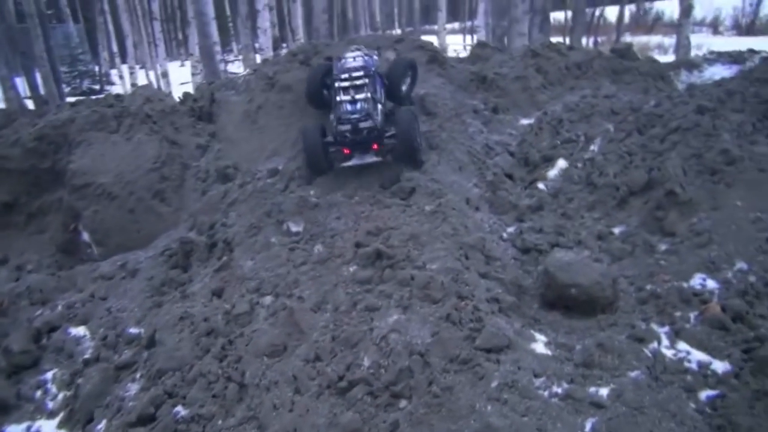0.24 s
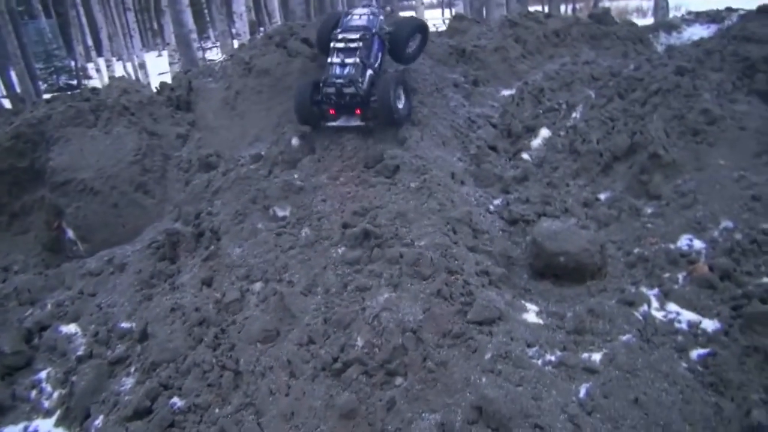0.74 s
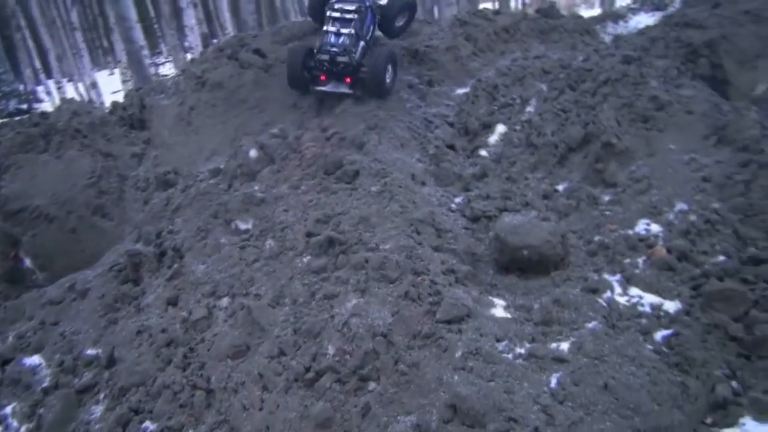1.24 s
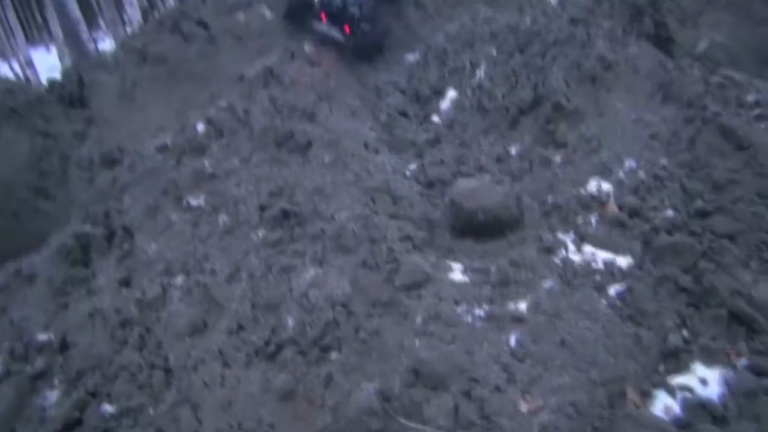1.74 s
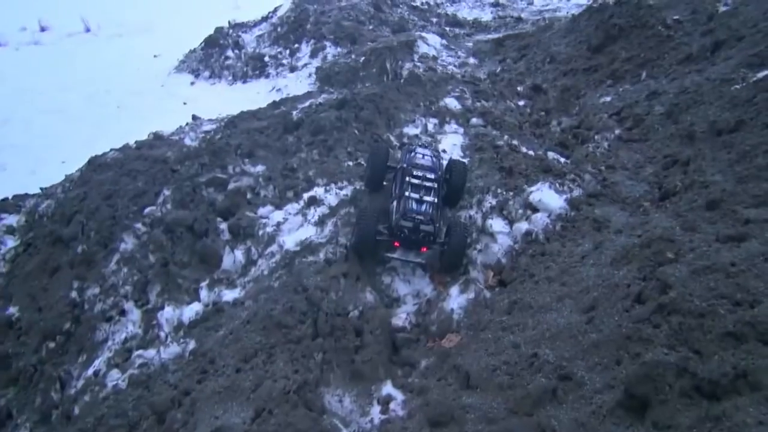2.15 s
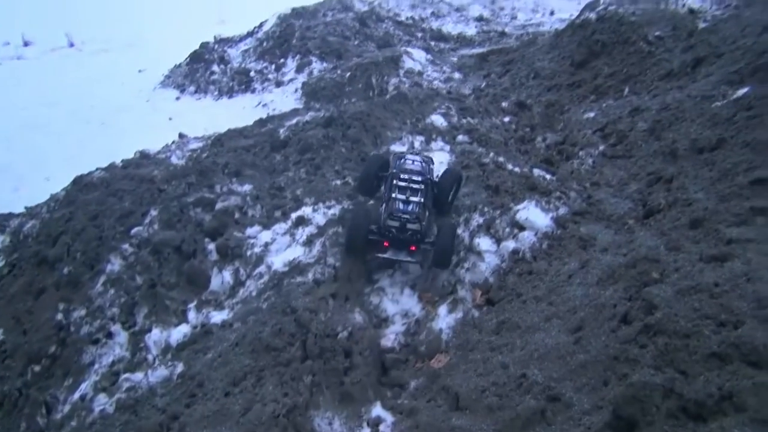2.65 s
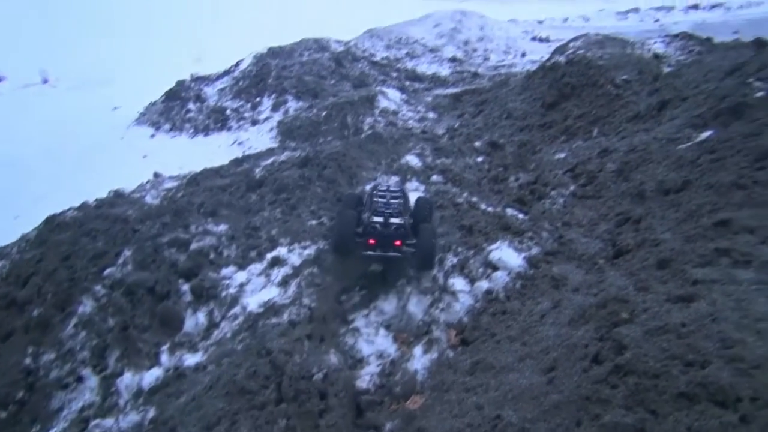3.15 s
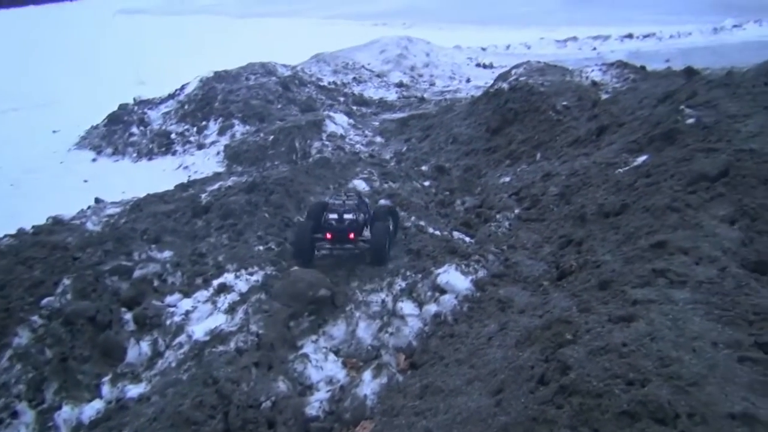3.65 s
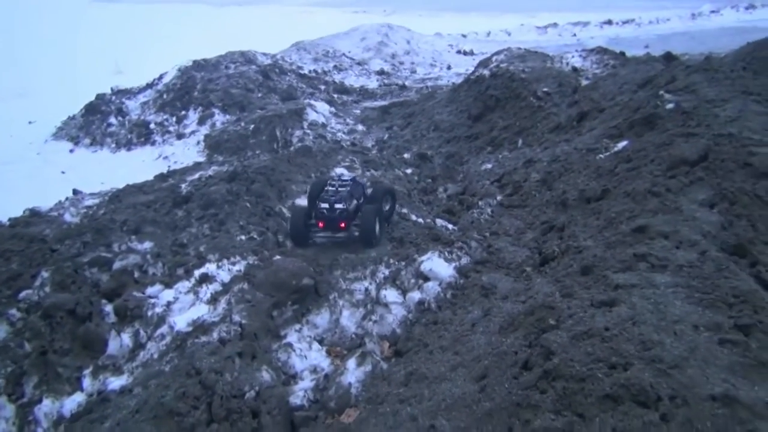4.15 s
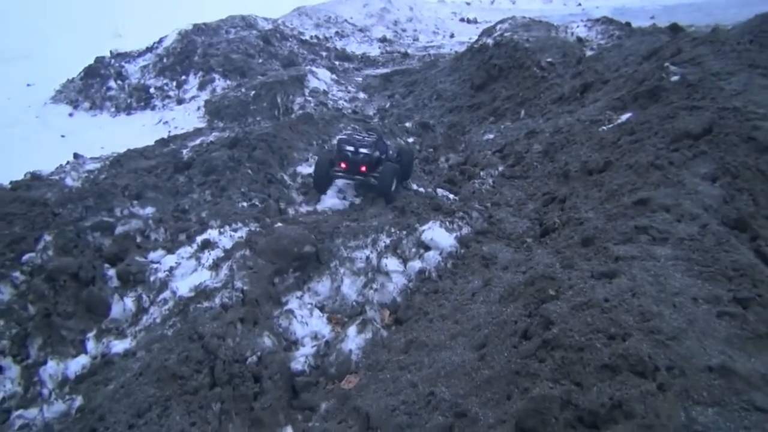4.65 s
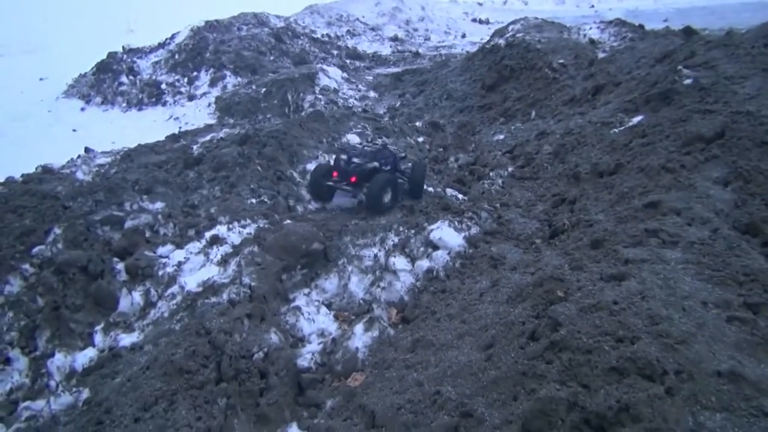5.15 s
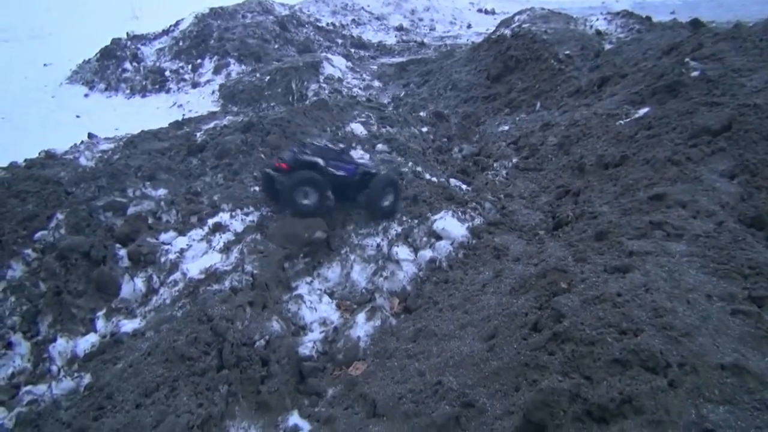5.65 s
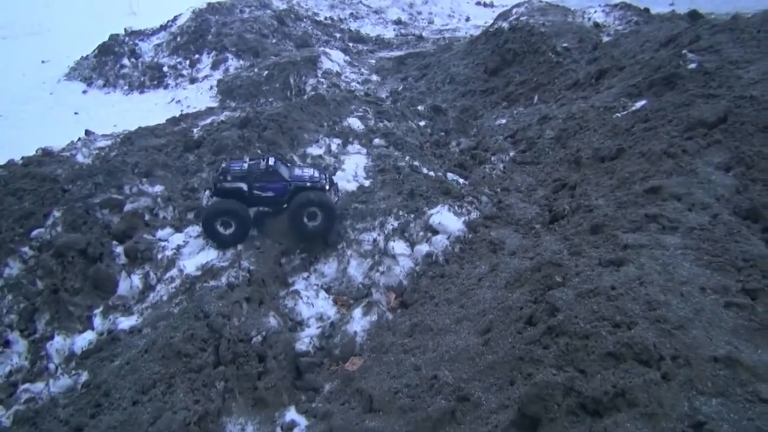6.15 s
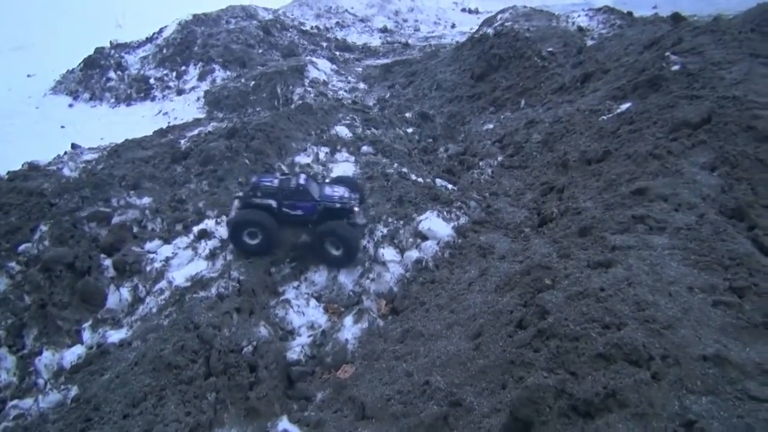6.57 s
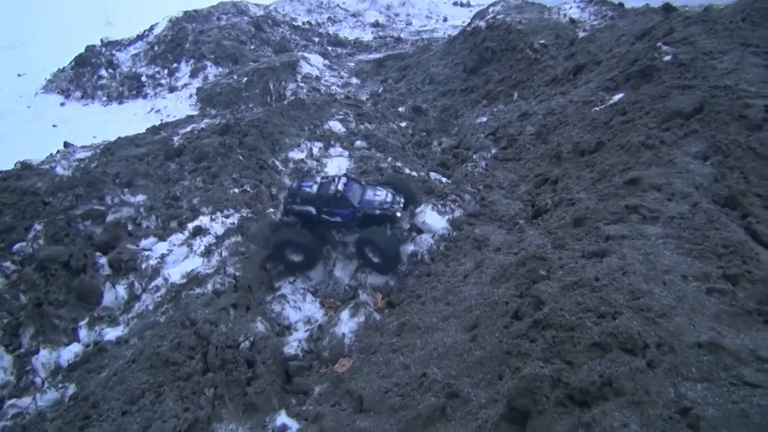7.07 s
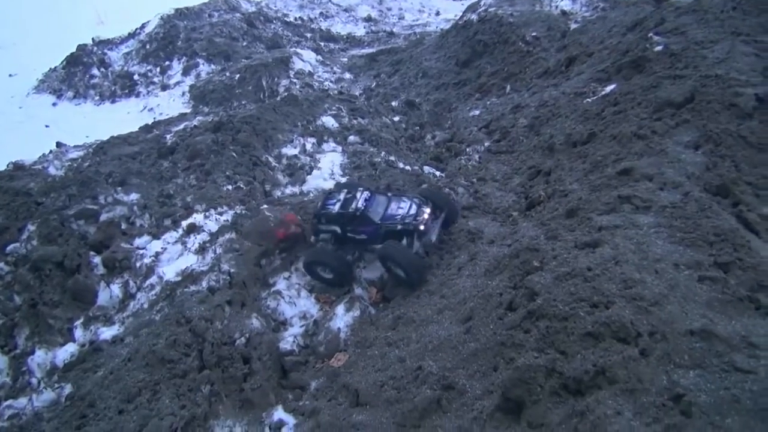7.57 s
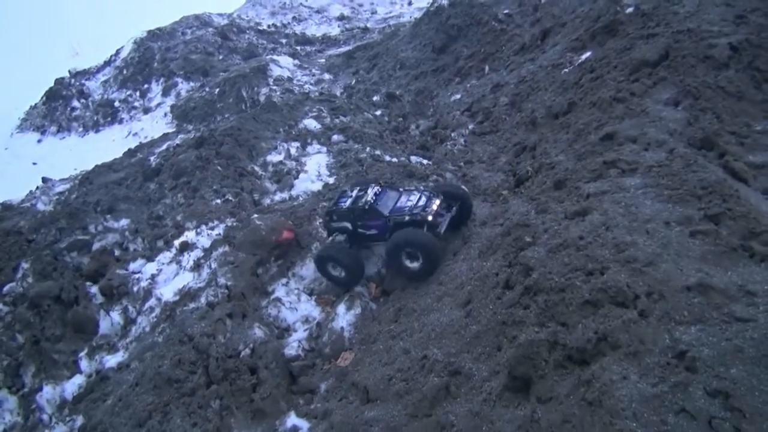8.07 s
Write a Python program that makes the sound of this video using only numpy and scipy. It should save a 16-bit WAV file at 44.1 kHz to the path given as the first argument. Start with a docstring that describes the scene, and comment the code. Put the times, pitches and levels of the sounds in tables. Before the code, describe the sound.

Outdoors, heard dry from a few metres: buzzing electric gears of a toy truck surge and sag, dry teeth chattering inside a light plastic shell. Tyres spray grit, the chassis knocks on hard ground. After a sharp knock the motor nearly dies, creeps, then revs in separate bursts, the highest past the middle. Later spurts are rougher and steadier, with high steering zips, small ticks and a thin held squeal, before a final upward rev.

```python
"""The gear mesh of a small electric radio-controlled truck whines with its motor speed, in spurts of throttle.
The truck crawls over frozen dirt a few metres away: meshing harmonics are shaped by gearbox resonances,
loose teeth rattle the plastic body as random impacts, and filtered grit noise makes the tyres crunch.
The chassis rumbles and knocks on the ground as damped modes of its shell, small contacts tick,
the motor brake hums and hisses, and the steering servo zips in glides and holds a thin tone."""
import sys
import numpy as np
from scipy import signal
from scipy.fft import rfft, irfft
from scipy.io import wavfile
from scipy.ndimage import uniform_filter1d

SR = 44100
rng = np.random.default_rng(int(sys.argv[2]) if len(sys.argv) > 2 else 0)


def file_out(sig):
    """Save sig as 16-bit WAV at sys.argv[1]."""
    # one column per channel
    cols = np.atleast_2d(sig).T
    # limit, then scale
    lim = np.clip(cols, -1, 1)
    pcm = np.round(lim * 32767).astype(np.int16)
    wavfile.write(sys.argv[1], SR, pcm)


N = 366912
TIME = np.arange(N) / SR

# spectrum of the chassis rumble: (frequency [Hz], relative density [dB per Hz])
RUMBLE_SPECTRUM = [(25, -37), (55, -30), (105, -20), (200, -13.5), (290, -8), (420, -9), (600, -2.5),
                   (800, -2.5), (1000, -6)]
# spectrum of the tyre crunch, also used for brush hiss: (frequency [Hz], relative density [dB per Hz])
CRUNCH_SPECTRUM = [(3000, 0.5), (5200, 6), (6200, -1.5), (7700, 3), (8600, 2.5), (9700, 6.5), (10700, 3.5),
                   (12000, -1.5), (13500, -2), (16000, -8.5)]
# spectrum of the body rattle: (frequency [Hz], relative density [dB per Hz])
RATTLE_SPECTRUM = [(480, -15.5), (610, -1), (820, -12), (1050, -5), (1330, -1.5), (1650, 1), (1900, 0.5),
                   (2170, 1.5), (2600, -0.5), (2950, -3.5), (3350, -1.5), (3750, -5.5), (4150, -4),
                   (4550, -10), (5200, -8.5), (6000, -18)]

# the chassis shudders over a clod: (middle [s], level [dB])
BUMPS = [(.66, -44), (1.39, -32), (3.519, -34.5), (5.9, -37)]
BUMP_S = 0.22
# a tyre slips and sprays grit: (middle [s], length [s], level [dB])
SPRAYS = [(.05, 0.094, -35), (.3, 0.085, -25), (1.04, 0.089, -28), (1.34, 0.088, -25), (1.77, 0.062, -37.5),
          (3.83, 0.057, -44.5), (4.34, 0.067, -34.5), (4.44, .06, -41), (4.64, .1, -45.5), (5.6, 0.37, -44),
          (7.79, 0.071, -33)]

# the servo holds the wheels against the ground: (middle [s], length [s], level [dB])
SERVO_HOLDS = [(3.95, .4, -53), (4.7, 0.71, -54), (6.35, 0.76, -40.5), (7.05, 0.7, -34.5),
               (7.87, 0.42, -43)]
HOLD_HZ = 3366  # mean
# steering moves: (time [s], length [s], start [Hz], middle [Hz], end [Hz], level [dB])
STEERING_MOVES = [(1.883, 0.05, 4700, 5050, 4980, -42), (4.341, 0.053, 7200, 6330, 5220, -40),
                  (4.402, .075, 4500, 5070, 4500, -42.5), (6.132, .08, 6300, 6750, 6000, -42),
                  (7.758, 0.052, 7200, 6440, 5160, -35), (8.036, 0.057, 4900, 5110, 4920, -31.5),
                  (8.076, 0.078, 7000, 7150, 8260, -40)]
# motor brake: (start [s], end [s], hum level [dB], hiss level [dB])
BRAKES = [(1.834, 1.926, -33, -38), (4.259, 4.339, -31, -39.5)]
BRAKE_HZ = 910  # mean

# grit and linkage ticks: (time [s], relative peak level [dB], centre frequency [Hz])
TICKS = [(1.935, -32, 2290), (1.959, -36, 2900), (1.996, -40, 3000), (2.033, -39, 4590), (2.077, -37, 4700),
         (2.16, -37, 3130), (2.204, -40, 5070), (4.35, -21, 4230), (4.391, -19, 3680), (4.522, -37, 12600),
         (4.675, -31, 9500), (6.052, -21.5, 12070), (7.936, -20, 8900), (7.947, -16, 7490),
         (7.95, -16, 2960), (7.986, -27, 10960)]
# the chassis lands or a drive shaft takes up its slack:
# (time [s], peak level [dB], treble tilt [dB per two octaves])
KNOCKS = [(0.626, -10.5, 2), (.941, -15, 2), (1.845, -5, -4), (2.395, -19.5, -32), (4.263, -5.5, -6),
          (4.489, -20.5, -39), (6.469, -14, 2), (7.745, -12.5, -5), (8.23, -23.5, -4)]
# modes of the plastic body shell: (frequency [Hz], level [dB], 60 dB decay time [s])
SHELL_MODES = [(726.9, 10, 0.081), (998.2, 3.5, 0.027), (1544, 23.5, 0.023), (1780, 7, 0.022),
               (2460, 7, 0.035), (2850, 11, .03), (3530, 11, .016), (4240, 14, 0.012), (5120, 19, 0.016),
               (6220, 6, .012), (7800, -15, .01)]

# upper mesh overtones: (multiple of the mesh frequency [1], level relative to the spurt's upper overtones level
# [dB])
OVERTONES = [(3, -2), (4, -6), (5, -15), (6, -15.5)]
# radiation of tones by the gearbox: (frequency [Hz], gain [dB])
GEARBOX_RADIATION = [(470, -7), (590, 2.5), (830, -5.5), (1030, -1.5), (1200, 1.5), (1400, 1), (1700, 1),
                     (2300, -2.5), (3500, -4.5), (5000, -10.5), (6200, -5), (8500, -17), (9500, 7.5),
                     (10300, 7), (11200, -4), (12000, 0), (16000, -17)]
# narrow gearbox resonances: (frequency [Hz], width [Hz], level [dB])
HOUSING_MODES = [(1234, 48, -2), (1356, 99, 1), (2172, 45, -1.5), (2570, 240, -4.5)]

# motor speed, one curve for each spurt of throttle: (time [s], mean gear mesh frequency [Hz])
SPEEDS = [
    [(0, 1134), (.06, 1116), (.13, 863.5), (.28, 1001)],
    [(.37, 949), (.47, 1205), (.59, 1260), (.64, 1050)],
    [(.68, 942), (.74, 1208), (.82, 1242), (.9, 1164), (.99, 1020), (1.08, 1065)],
    [(1.13, 973), (1.22, 1367), (1.3, 1381), (1.35, 1542), (1.41, 1324), (1.48, 1275), (1.56, 1694),
     (1.6, 1320), (1.66, 594), (1.73, 373), (1.86, 385)],
    [(1.94, 192), (2.16, 190), (2.3, 311.4)],
    [(2.37, 420.4), (2.41, 582), (2.5, 555.6), (2.63, 617), (2.98, 636)],
    [(3.03, 657), (3.1, 710), (3.19, 696), (3.37, 1016), (3.48, 1187), (3.65, 612.6), (3.78, 352.4)],
    [(3.88, 356.7), (3.94, 706), (4.08, 1632), (4.14, 1312), (4.25, 907)],
    [(4.33, 420), (4.55, 522)],
    [(4.78, 425.4), (4.83, 1050), (4.94, 1163), (4.98, 777)],
    [(5.05, 760), (5.17, 1714), (5.27, 1638), (5.37, 1761)],
    [(5.41, 1915), (5.49, 2470), (5.57, 2380), (5.63, 2682), (5.71, 2473), (5.8, 1636), (5.85, 1290),
     (5.9, 1140), (5.96, 770), (6.11, 405)],
    [(6.21, 482), (6.29, 697), (6.38, 1080), (6.43, 1200), (6.52, 915), (6.62, 1048), (6.76, 1041)],
    [(6.86, 767.6), (6.98, 884.4), (7.06, 1073), (7.15, 1214), (7.21, 1150), (7.29, 963), (7.42, 1002)],
    [(7.5, 710), (7.54, 630), (7.64, 539.6), (7.88, 563), (8.0, 478)],
    [(8.16, 587), (8.22, 1040), (8.28, 1294), (8.32, 1360)],
]
# levels of the same spurts far above the speed knees: (mesh tone [dB], octave [dB],
# upper overtones [dB], rattle [dB], crunch [dB], rumble [dB])
SPURT_LEVELS = [ (-33, -23.5, -20, -20, -22.5, -38.5), (-21, -26, -25.5, -20, -23.5, -36),
                (-17.5, -27.5, -18, -20, -23.5, -37.5), (-19.5, -24.5, -22.5, -20.5, -26, -38),
                (-35, -35, -34, -20.5, -28, -43), (-20.5, -27.5, -23, -21.5, -26, -42),
                (-26.5, -25.5, -30, -23, -30, -38.5), (-23, -28, -27, -23.5, -29, -38),
                (-35, -42, -47, -22.5, -29.5, -36.5), (-29.5, -28.5, -29, -26.5, -31, -36.5),
                (-26, -31.5, -27.5, -25, -30.5, -36), (-20, -27, -24.5, -22.5, -25, -36),
                (-18, -30, -22, -20, -24, -38.5), (-20, -25, -22, -20.5, -23, -38),
                (-20, -24.5, -17.5, -18, -23, -37.5), (-23, -21, -19.5, -21.5, -25.5, -38.5)]
BLEND_S = 0.07  # one spurt gives way to the next

# each sound grows with motor speed up to a knee, then levels off
TONE_KNEE_HZ, TONE_DB_PER_OCTAVE = 1203, 18.5
OVERTONE_KNEE_HZ, OVERTONE_DB_PER_OCTAVE = 885, 23
RATTLE_KNEE_HZ, RATTLE_DB_PER_OCTAVE = 1043, 14
CRUNCH_KNEE_HZ, CRUNCH_DB_PER_OCTAVE = 1318, 13.5
RUMBLE_KNEE_HZ, RUMBLE_DB_PER_OCTAVE = 418.6, 5

TOP_HZ = 15750  # upper limit of the microphone channel


def undb(db):
    """Level to amplitude: 20 dB is a factor of ten."""
    return 10 ** (np.asarray(db) / 20)


def unit(x):
    """Normalisation to an rms of 1."""
    return x / np.sqrt(np.mean(x ** 2) + 1e-18)


def curves(table):
    """Linear interpolation in time of the columns of a table."""
    s, *columns = np.transpose(table)
    return [np.interp(TIME, s, c) for c in columns]


def response(hz, points):
    """Frequency response: gain interpolated in dB over log frequency."""
    f, db = np.transpose(points)
    return undb(np.interp(np.log(np.maximum(hz, 1)), np.log(f), db))


def colour(x, points):
    """Minimum-phase filtering to a spectrum with steep skirts beyond its ends; rms 1."""
    hz = np.arange(N // 2 + 1) * SR / N + 1
    skirts = np.minimum(hz / points[0][0], 1) * np.minimum(points[-1][0] / hz, 1)
    cepstrum = irfft(np.log(response(hz, points) * skirts ** 4 + 1e-6), N)
    # folding the cepstrum onto positive time makes the filter causal
    cepstrum[1:N // 2] *= 2
    cepstrum[N // 2 + 1:] = 0
    return unit(irfft(rfft(x) * np.exp(rfft(cepstrum)), N))


def band(x, hz, width_hz):
    """Simple resonance with a gain of 1 at its centre."""
    centre = min(hz, .45 * SR)
    b, a = signal.iirpeak(centre, centre / min(width_hz, SR / 4), fs=SR)
    return signal.lfilter(b, a, x)


def walk(rate):
    """Low-pass random fluctuation, changing about rate times a second; rms 1."""
    re, im = rng.standard_normal(size=(2, N // 20))
    hz = np.arange(len(re)) * SR / N
    return unit(irfft((re + 1j * im) / (1 + (2 * hz / rate) ** 4), N))


def turns(hz):
    """Phase in radians as the running integral of frequency."""
    return 2 * np.pi * np.cumsum(hz) / SR


def clicks(rate, scatter_db):
    """Random impact train, on average rate a second, of scattered size and sign."""
    struck = rng.random(N) < rate / SR
    return struck * rng.standard_normal(N) * undb(scatter_db * rng.standard_normal(N))


def add(out, s, x):
    """Superposition of x on out from time s."""
    i = max(int(s * SR), 0)
    out[i:i + len(x)] += x[:max(N - i, 0)]


def swell(middle_s, length_s):
    """Half-cosine envelope: a smooth rise to 1 and fall back to 0."""
    return np.cos(np.pi * np.clip((TIME - middle_s) / length_s, -.5, .5))


def swells(rows):
    """Superposed envelopes of (middle [s], length [s], level [dB]) events."""
    return sum(undb(db) * swell(s, length) for s, length, db in rows)


def rumble(bump_db=1.5):
    """Random forcing at low frequency: tyre lugs and clods shake the chassis."""
    forcing = unit(clicks(500, 1.14)) + rng.standard_normal(N)
    return colour(forcing * undb(bump_db * walk(29)), RUMBLE_SPECTRUM)


def servo(octave_db=-13, flutter_db=3):
    """Gliding gear tones: tiny gears zip through each move; under load the servo holds a thin tone."""
    hold = unit(np.sin(turns(HOLD_HZ + 3 * walk(20.0))))
    out = swells(SERVO_HOLDS) * undb(2 * walk(9.7)) * hold
    for s, length, start_hz, middle_hz, end_hz, db in STEERING_MOVES:
        u = np.linspace(0, 1, int(length * SR))
        # a parabola through the three frequencies
        hz = np.polyval(np.polyfit([0, .5, 1], [start_hz, middle_hz, end_hz], 2), u)
        phase = turns(hz * (1 + .03 * walk(1200)[:len(u)]))
        envelope = np.sqrt(u * (1 - u)) * undb(flutter_db * walk(249.7)[:len(u)])
        octave = undb(octave_db) * response(2 * hz, GEARBOX_RADIATION) * np.sin(2 * phase)
        add(out, s, undb(db) * unit(envelope * (np.sin(phase) + octave)))
    return out


def brake(buzz_db=-15):
    """Current chopping: the speed controller makes the windings hum and the brushes hiss."""
    phase = turns(BRAKE_HZ * (1 + 0.0057 * walk(57)))
    buzz = np.sin(3 * phase) + .5 * np.sin(2 * phase)
    hum = unit(np.sin(phase) + undb(buzz_db) * buzz)
    hiss = colour(rng.standard_normal(N), CRUNCH_SPECTRUM)
    out = np.zeros(N)
    for start, end, hum_db, hiss_db in BRAKES:
        braking = 1. * ((TIME > start) & (TIME < end))
        gate = uniform_filter1d(braking, size=180)  # edges of about 4 ms
        out += gate * (undb(hum_db) * hum + undb(hiss_db) * hiss)
    return out


def ticks(decay_s=0.0018, gain_db=-1):
    """Impulsive excitation of a broad resonance by small hard contacts."""
    out, t = np.zeros(N), TIME[:SR // 30]
    for s, db, hz in TICKS:
        contact = rng.standard_normal(len(t)) * np.sqrt(t) * np.exp(-t / decay_s)
        x = band(band(contact, hz, 0.55 * hz), hz, 0.51 * hz)
        add(out, s, undb(db + gain_db) * x / abs(x).max())
    return out


def knocks(rise_s=0.0012, contact_s=0.0017, rebound_s=0.0053, rebound=0.43, crack=0.018, low_hz=330):
    """Modal impact: a gritty blow and its rebound ring a shell too small to radiate bass."""
    out, t = np.zeros(N), TIME[:SR // 5]
    high_pass = signal.butter(2, low_hz, "high", fs=SR, output="sos")
    for s, db, treble_db in KNOCKS:
        push = np.minimum(t / rise_s, 1) * np.exp(-t / contact_s)
        push += rebound * (t > rebound_s) * np.exp(-abs(t - rebound_s) / contact_s)
        blow = push * rng.standard_normal(len(t))
        ring = np.zeros(len(t))
        for f, mode_db, t60 in SHELL_MODES:
            tilt_db = treble_db * np.log2(f / 1500) / 2
            ring += undb(mode_db + tilt_db - 60 * t / t60) * np.cos(2 * np.pi * f * t)
        x = unit(signal.fftconvolve(blow, ring)[:len(t)])
        x = x + crack * undb(treble_db) * unit(blow)
        x = signal.sosfilt(high_pass, x)
        add(out, s, undb(db) * x / abs(x).max())
    return out


def crunch(phase, grain_db=3, meshing=0.15, flicker_db=1.5):
    """Granular and friction noise: grit under the tyres, and dry teeth scraping once a mesh cycle."""
    scrape = rng.standard_normal(N) * (1 + meshing * np.cos(phase))
    noise = unit(clicks(3200, grain_db)) + 1.9 * scrape
    return colour(noise * undb(flicker_db * walk(150)), CRUNCH_SPECTRUM)


def housing(x):
    """Resonance: narrow gearbox modes pick out whatever sweeps across them."""
    return x + sum(undb(db) * band(x, hz, width) for hz, width, db in HOUSING_MODES)


def panels(x, t60_s=0.022, echo_db=-2):
    """Reverberant decay: thin plastic panels smear and break up gliding tones."""
    t = TIME[:SR // 10]
    tail = rng.standard_normal(len(t)) * undb(-60 * t / t60_s)
    lingering = signal.fftconvolve(x, tail / np.linalg.norm(tail))[:N]
    return (x + undb(echo_db) * lingering) / np.hypot(1, undb(echo_db))


def rattle(phase, hz, scatter_db=2, chatter_db=1.5, loose_db=-1, bursts_db=-4):
    """Backlash impacts: teeth strike singly or in runs, with loose clicks, and ring the plastic body."""
    # one strike a mesh cycle; the root keeps the mean power independent of speed
    strikes = np.diff(np.floor(phase / (2 * np.pi)), prepend=0) / np.sqrt(hz)
    single = unit(strikes * rng.standard_normal(N) * undb(scatter_db * rng.standard_normal(N)))
    runs = unit(strikes * walk(340))
    impact = np.clip((hz - 400) / 800, 0, 1)  # slow teeth roll on each other instead of striking
    loose = undb(loose_db) * np.sqrt(2.4 - 1.5 * impact ** 2) * unit(clicks(12000, 1.3))
    blows = impact * (single + undb(bursts_db) * runs) + loose
    return unit(housing(colour(blows * undb(chatter_db * walk(88)), RATTLE_SPECTRUM)))


def whine(phase, hz, tone_db, octave_db, upper_db, flutter_db=3.0, runout=0.33, half_db=-19, teeth=11):
    """Gear mesh harmonics: an off-centre pinion adds sidebands, uneven tooth contact roughens each line."""
    looseness = hz / 1200  # the faster the gears, the more their teeth bounce

    def partial(multiple, rough, blur_hz):
        """One harmonic under random contact and pinion-rate amplitude modulation."""
        bounce = rough * looseness
        contact = 1 + bounce * (walk(blur_hz) + 1j * walk(blur_hz))
        contact = contact / np.sqrt(1 + 2 * bounce ** 2)
        line = (contact * np.exp(1j * multiple * phase)).real
        depth = runout * looseness / np.hypot(1, looseness) * (1 + walk(9.6))
        wobble = 1 + depth * np.cos(phase / teeth + walk(19))
        return unit(line * wobble * undb(flutter_db * walk(55)))

    upper = np.zeros(N)
    for k, db in OVERTONES:
        upper += undb(db) * response(k * hz, GEARBOX_RADIATION) * partial(k, .42, 100 * k)
    tone = partial(1, .28 * np.sqrt(1 + np.maximum(looseness - 1, 0) * 3), 380)
    octave = partial(2, .42, 360)
    half = partial(.5, 2, 200)  # alternate teeth bite unevenly and growl an octave below
    overtones = undb(octave_db) * housing(octave) + undb(upper_db) * upper
    low_lines = response(hz, GEARBOX_RADIATION) * tone + undb(half_db) * half
    return undb(tone_db) * low_lines + panels(overtones, echo_db=-1)


def growth(hz, knee_hz, db_per_octave):
    """Power law of speed with saturation: a steady slope in dB under the knee, flat above it."""
    return -db_per_octave * np.log2(1 + (knee_hz / hz) ** 4) / 4


def throttle():
    """Piecewise drive: motor speed, and the levels of the spurt under way."""
    starts = [speed[0][0] for speed in SPEEDS[1:]]
    hz, = curves(np.concatenate(SPEEDS))
    levels_db = np.transpose(SPURT_LEVELS)[:, np.searchsorted(starts, TIME)]
    return hz, uniform_filter1d(1. * levels_db, size=int(BLEND_S * SR), axis=1)


def scene():
    """Common drive and comb filtering: one motor speed, and one close ground reflection of its sounds."""
    hz, (tone_db, octave_db, upper_db, rattle_db, crunch_db, rumble_db) = throttle()
    tone_db = tone_db + growth(hz, TONE_KNEE_HZ, TONE_DB_PER_OCTAVE)
    # harder tooth contact, more overtones
    bite_db = growth(hz, OVERTONE_KNEE_HZ, OVERTONE_DB_PER_OCTAVE)
    clatter = undb(rattle_db + growth(hz, RATTLE_KNEE_HZ, RATTLE_DB_PER_OCTAVE))
    rolling = undb(crunch_db + growth(hz, CRUNCH_KNEE_HZ, CRUNCH_DB_PER_OCTAVE))
    grit = np.hypot(rolling, swells(SPRAYS))
    shaking = undb(rumble_db + growth(hz, RUMBLE_KNEE_HZ, RUMBLE_DB_PER_OCTAVE))
    shake = np.hypot(shaking, swells((s, BUMP_S, db) for s, db in BUMPS))
    hz = hz * (1 + .007 * walk(70) + .003 * walk(18))  # tyre lugs and clods jog the motor speed
    phase = turns(hz)
    gears = whine(phase, hz, tone_db, octave_db + bite_db, upper_db + bite_db)
    gears = gears + clatter * rattle(phase, hz)
    truck = gears + grit * crunch(phase) + shake * rumble()
    lag_s = 0.000891 + 0.00017 * walk(3.17)  # the reflection's path shifts as the truck rocks
    truck = truck + 0.28 * np.interp(TIME - lag_s, TIME, truck, left=0)
    return np.tile(truck + knocks() + ticks() + brake() + servo(), (2, 1))  # two equal channels


def record(dry, low_hz=35):
    """Band limiting: the microphone channel thins the deepest bass and cuts the top steeply."""
    thin = signal.sosfilt(signal.butter(1, low_hz, "high", fs=SR, output="sos"), dry)
    return signal.sosfilt(signal.ellip(10, .2, 80, TOP_HZ, fs=SR, output="sos"), thin)


dry = scene()
out = record(dry)
file_out(out)
```